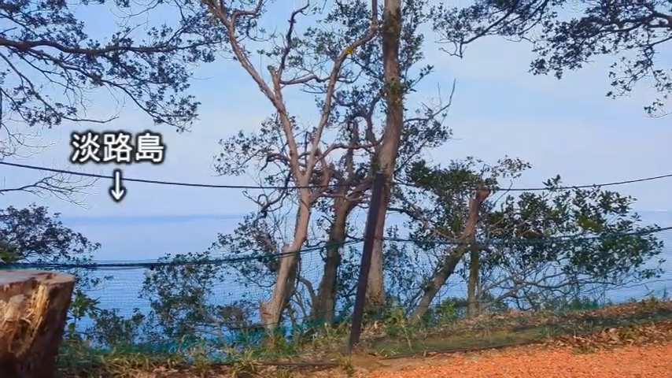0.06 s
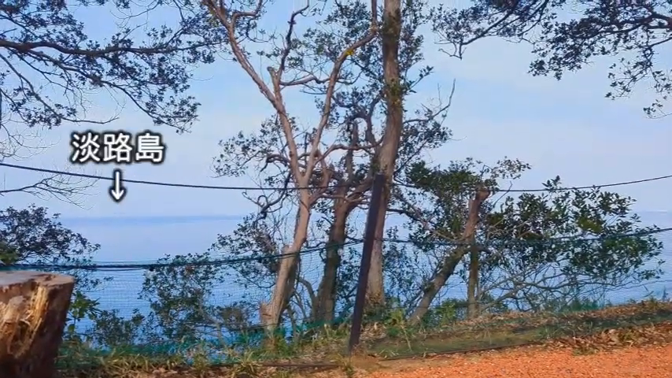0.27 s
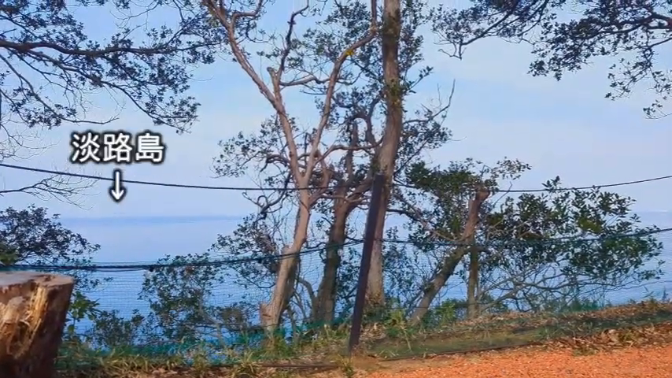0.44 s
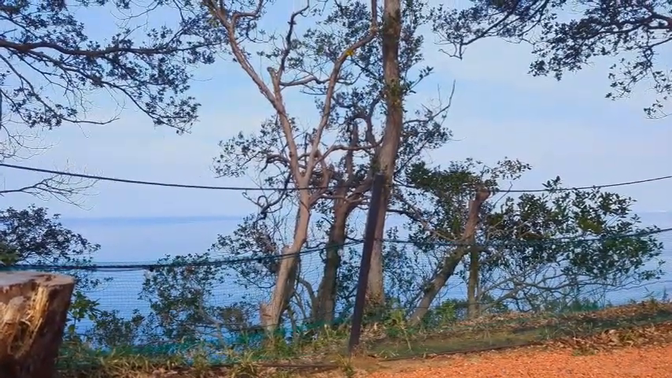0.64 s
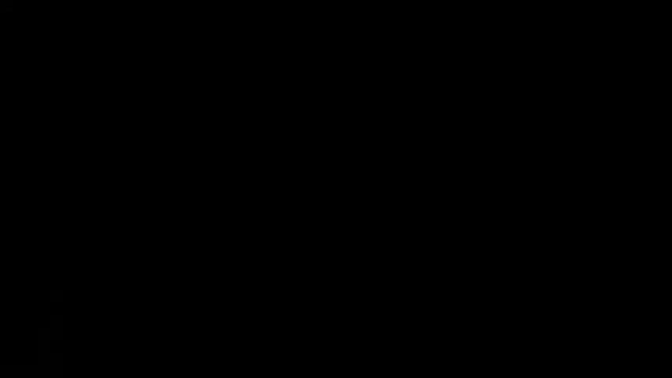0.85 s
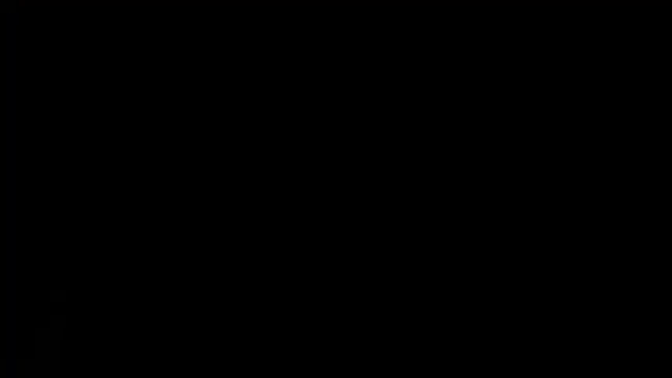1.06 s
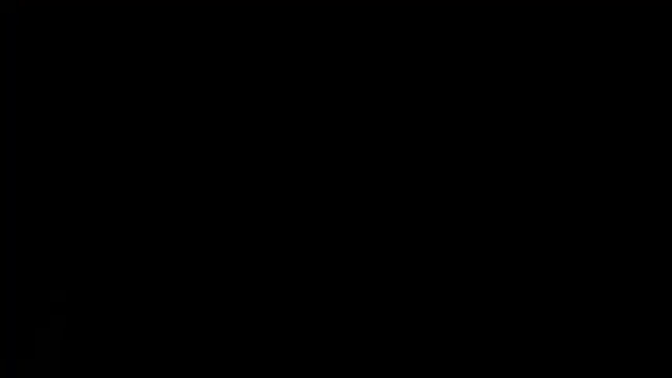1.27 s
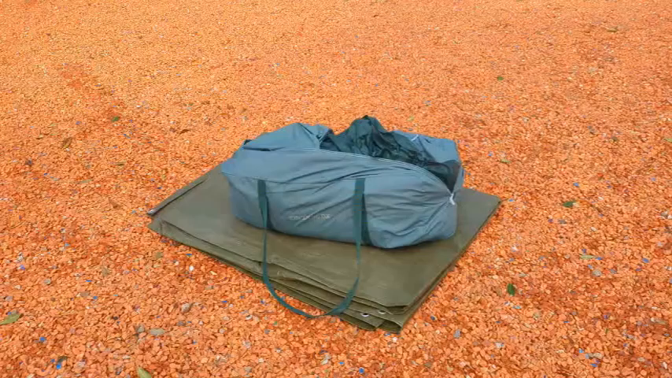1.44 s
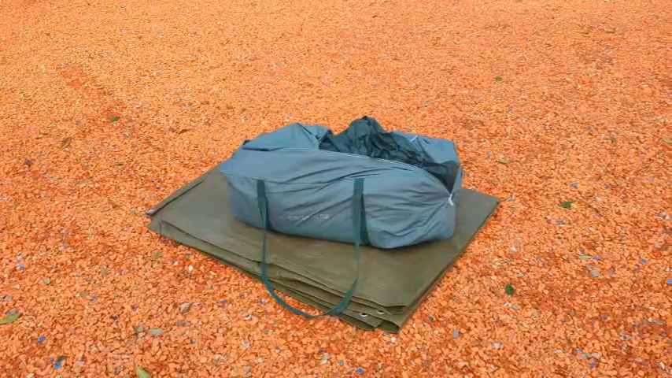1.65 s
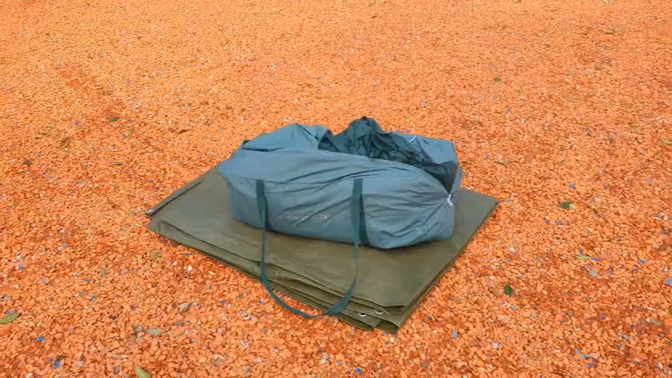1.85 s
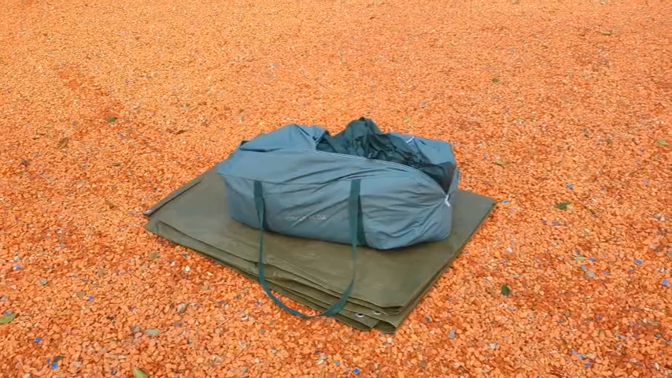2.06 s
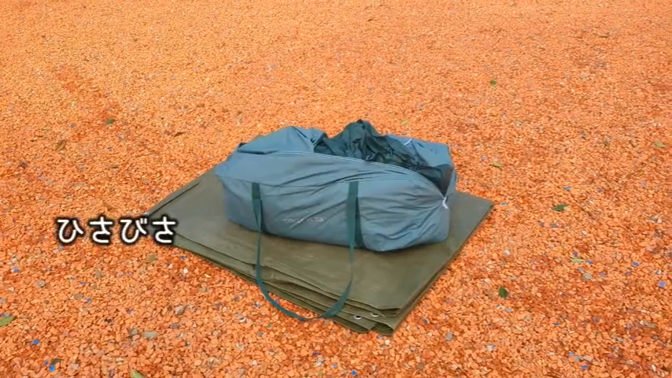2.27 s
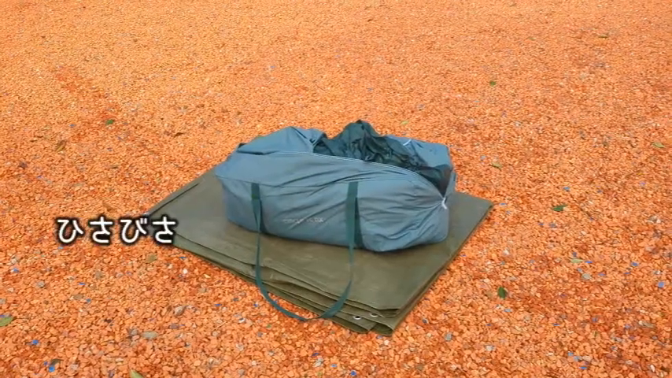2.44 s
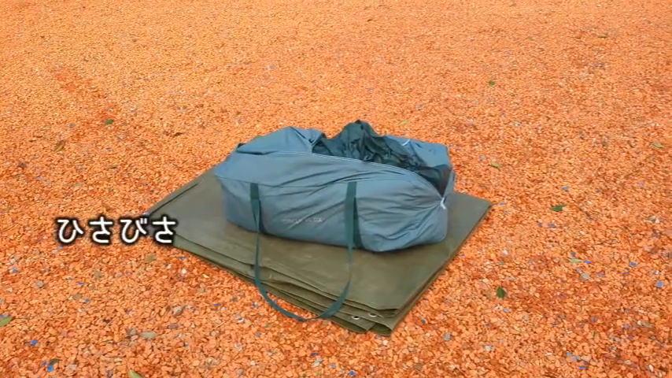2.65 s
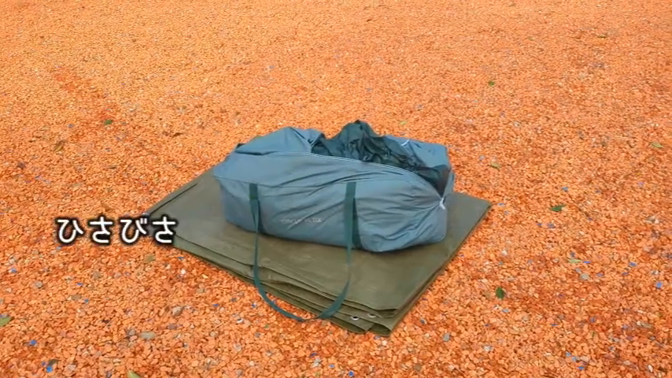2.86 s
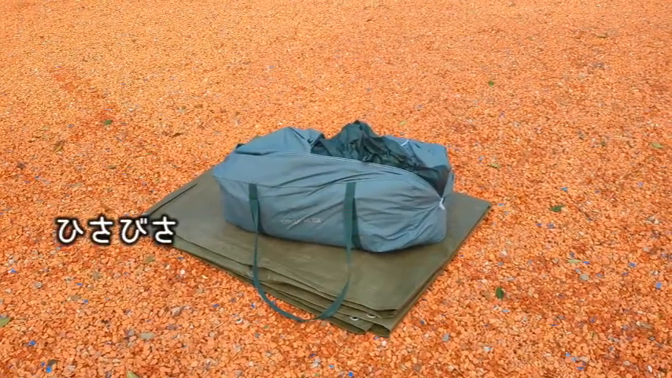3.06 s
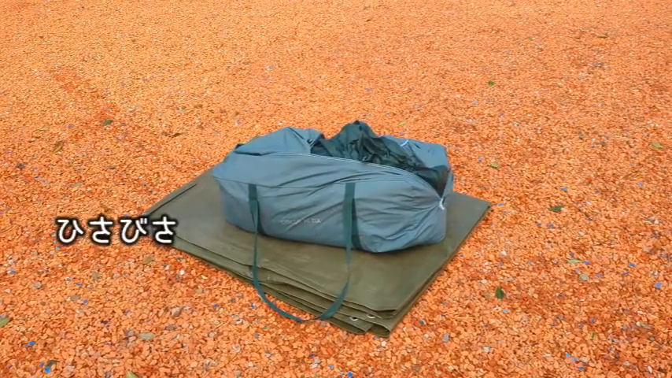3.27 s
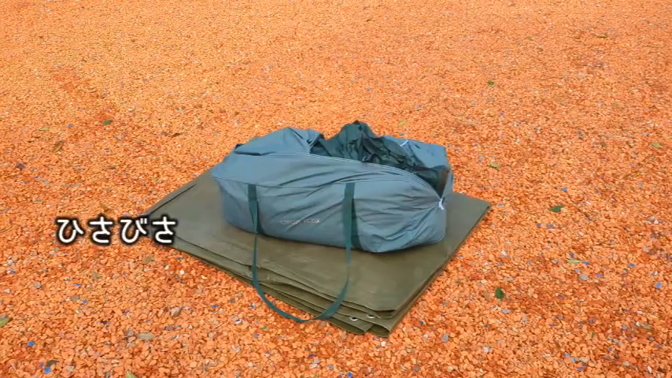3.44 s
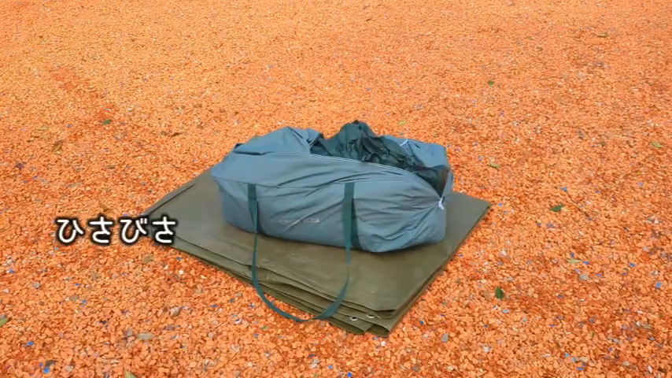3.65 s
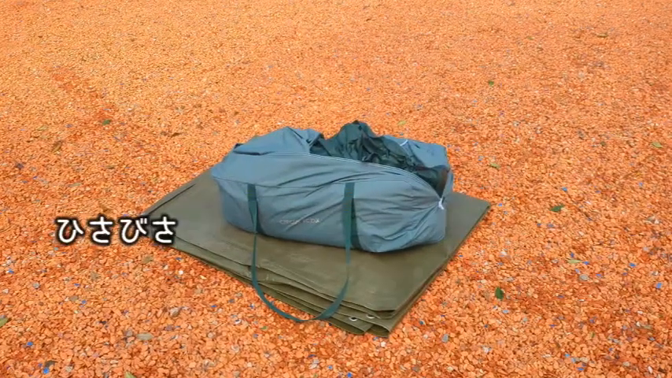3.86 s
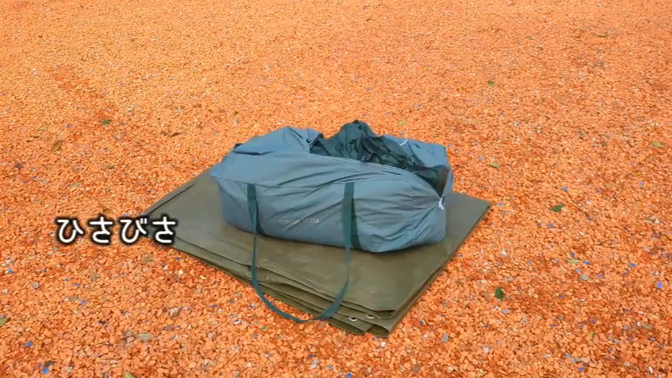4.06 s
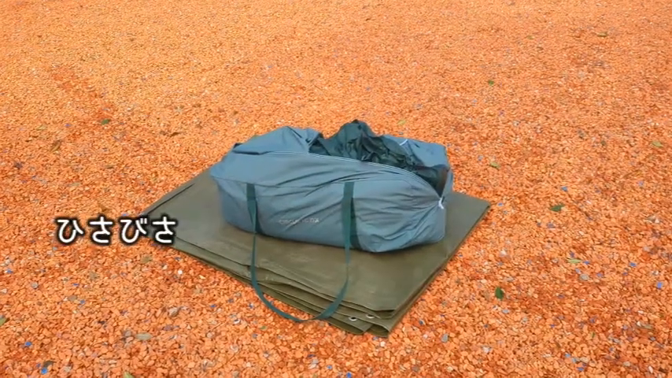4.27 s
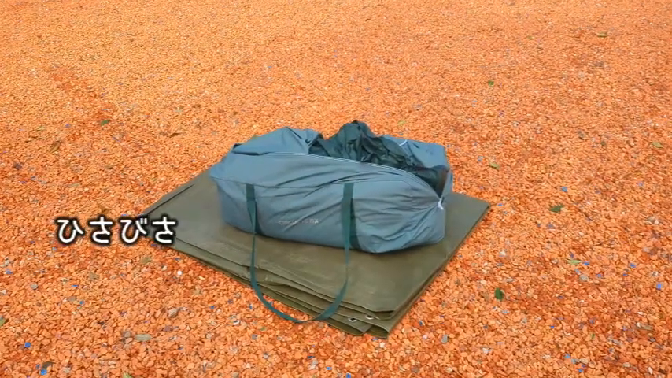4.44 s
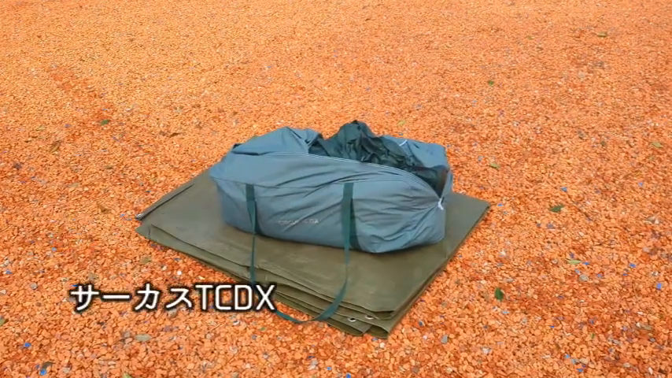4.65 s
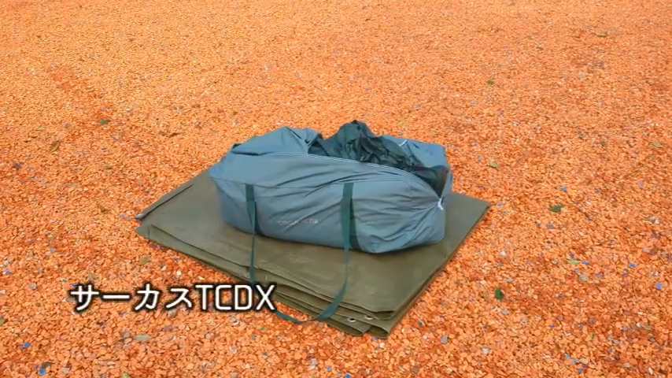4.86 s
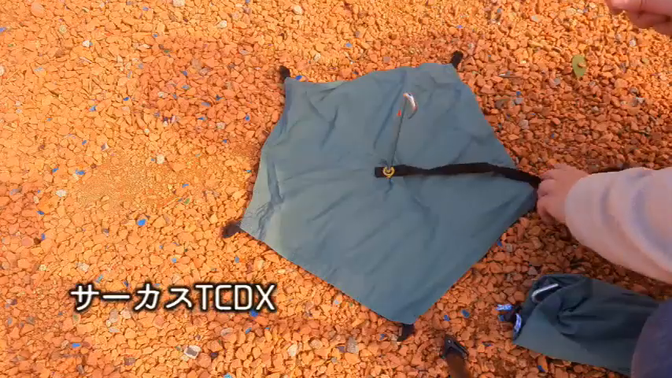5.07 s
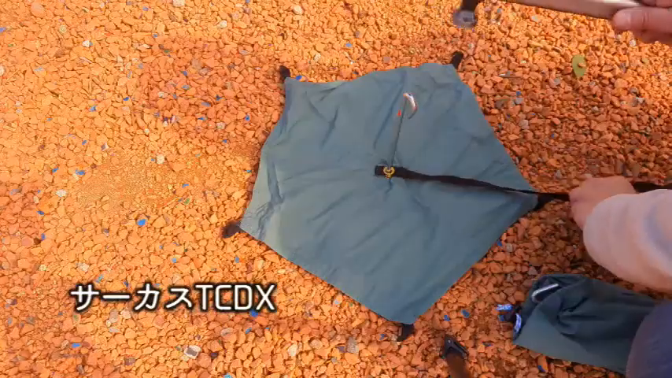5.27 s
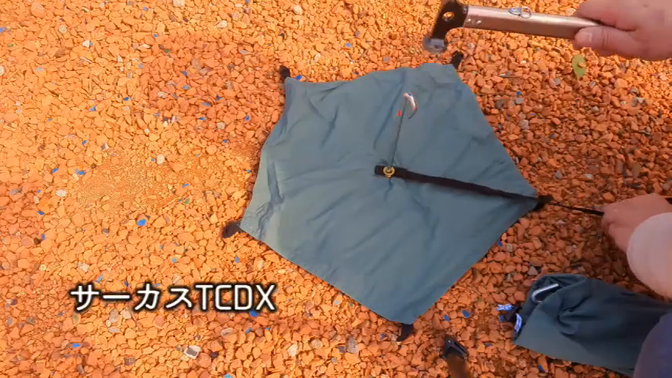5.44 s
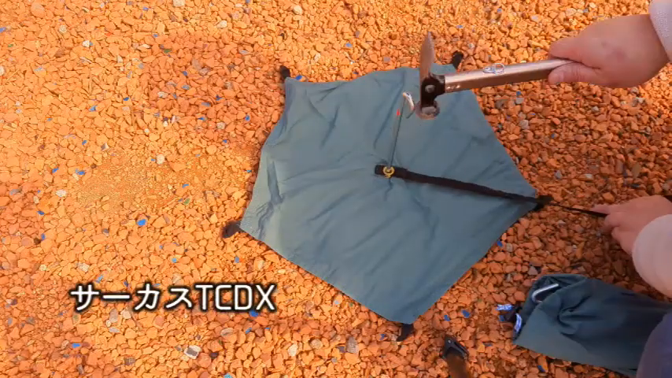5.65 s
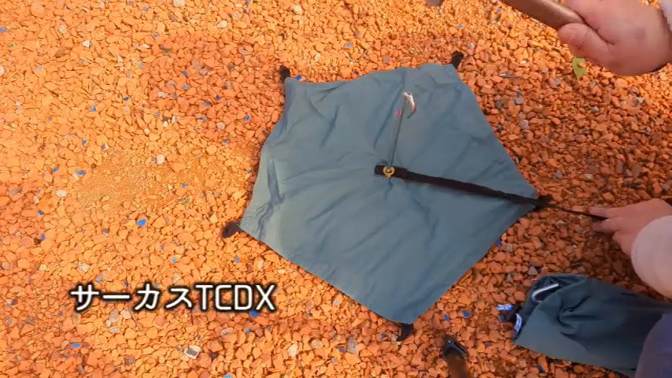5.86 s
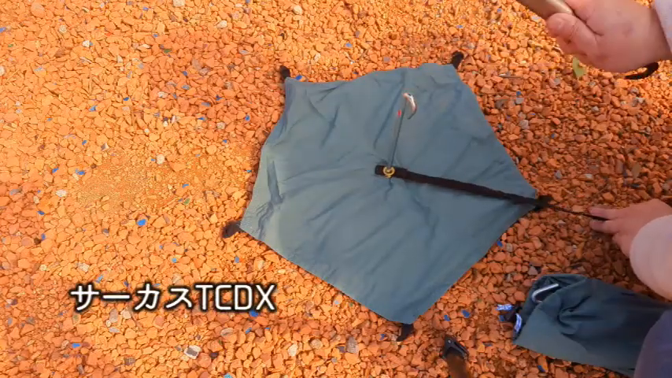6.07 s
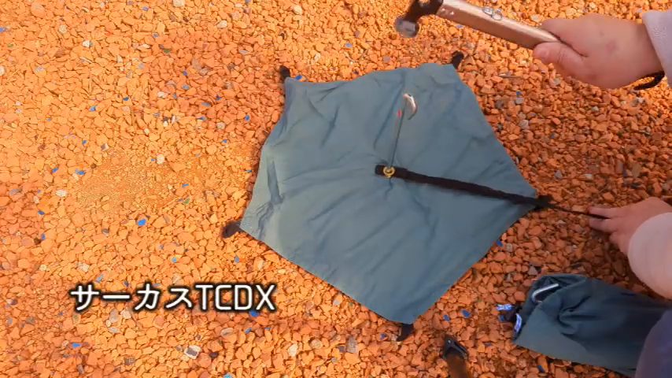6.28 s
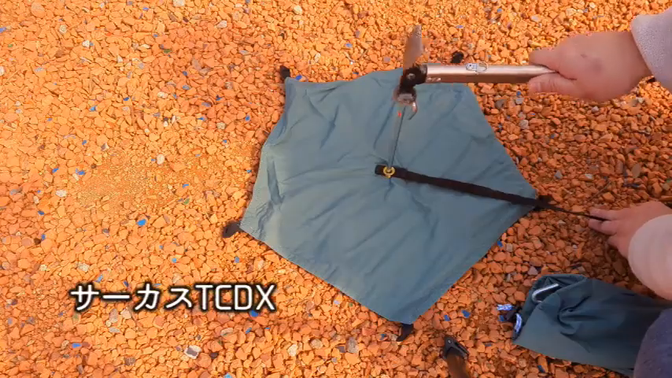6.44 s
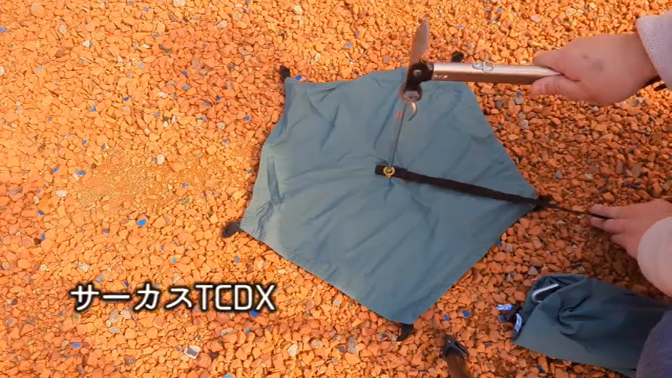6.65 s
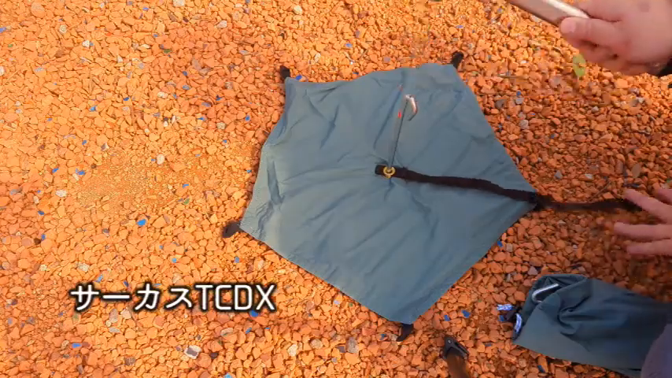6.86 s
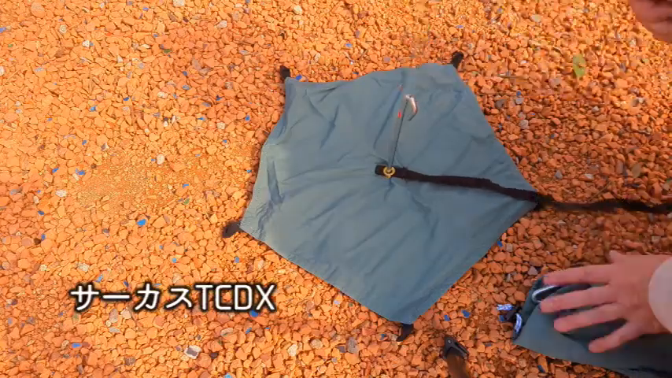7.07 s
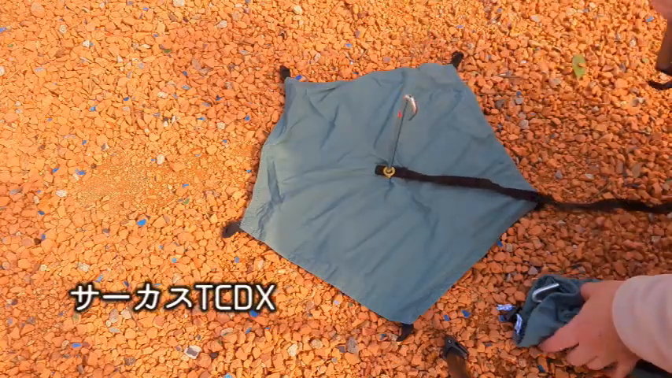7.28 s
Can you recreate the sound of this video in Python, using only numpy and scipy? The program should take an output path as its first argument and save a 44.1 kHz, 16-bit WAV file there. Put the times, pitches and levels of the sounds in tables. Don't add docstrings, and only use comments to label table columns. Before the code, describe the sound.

A quiet outdoor opening of wind rumble and far surf hiss cuts to complete silence. It returns with a steady low motor hum, wind and soft booming bumps of hands on the camera. Another cut brings a close steel hammer: strap rustle and a light touch, then five loud, evenly spaced cracks on a peg in gravel, each ringing briefly and scattering off trees. Small stereo camera microphone; cloth and gravel rustle at the end.

```python
import sys
import numpy as np
from scipy import signal
from scipy.fft import rfft, irfft
from scipy.io import wavfile
from scipy.ndimage import uniform_filter1d

SR = 44100
rng = np.random.default_rng(int(sys.argv[2]) if len(sys.argv) > 2 else 0)


def persist_wave(psi):
    counts = np.round(np.clip(psi, -1, 1) * 32767).astype(np.int16)
    wavfile.write(sys.argv[1], SR, np.atleast_2d(counts).T)


def amplitude_ratio(level_db):
    exponent = np.asarray(level_db, float) / 20
    return 10 ** exponent


N = 322371
T = np.arange(N) / SR

# start in seconds, end in seconds, delay of the left microphone in samples.
SHOTS = [
    (0, .846, -16),
    (1.452, 4.884, -8),
    (4.884, 7.4, 2),
]


def shape(x, points):
    hz, db = np.transpose(points)
    f = np.fft.rfftfreq(x.shape[-1], 1 / SR) + 1
    gain = amplitude_ratio(np.interp(np.log(f), np.log(hz), db))
    return irfft(rfft(x) * gain, x.shape[-1])


def band(x, hz, width_hz):
    centre_hz = min(hz, .42 * SR)
    sharpness = max(hz / min(width_hz, SR / 3), .3)
    return signal.lfilter(*signal.iirpeak(centre_hz, sharpness, SR), x)


def unit(x):
    return x / np.sqrt(np.mean(x ** 2))


def fade(t, t60):
    return (t >= 0) * np.exp(-np.log(1000) * np.abs(t) / t60)


def walk(rate):
    k = int(SR / rate)
    steps = np.repeat(rng.standard_normal(N // k + 1), k)
    return 1.48 * uniform_filter1d(uniform_filter1d(steps, k), k)[:N]


def add(out, s, sound, pan_db=0.):
    i = int(s * SR)
    n = min(sound.shape[-1], N - i)
    out[:, i:i + n] += sound[..., :n] * amplitude_ratio(np.array([[pan_db], [-pan_db]]) / 2)


def late_lows(colour):
    f = np.fft.rfftfreq(SR // 2, 1 / SR) + 1
    delay_s = 0.054 * (55 / np.maximum(f, 30)) ** 1.7
    phase = 2 * np.pi * np.cumsum(delay_s + 0.0024) * 2
    push = shape(irfft(np.exp(-1j * phase)), colour)
    return push[:SR // 4] / np.abs(push).max()


def air():
    # pitch in Hz, level in dB.
    rumble = [
        [(15, -43), (25, -29), (42, -9.5), (65, 3.5), (97, -9.5), (130, -1), (172, -22.5), (195, -19),
         (400, -39), (520, -58), (880, -120)],
        [(15, -43.5), (25, -14), (38, -3.5), (69, 3), (97, -11), (117, -4.5), (156, -13.5), (400, -41),
         (520, -69.5), (880, -120)],
        [(15, -48), (25, -18.5), (43, -4), (65, 2), (81, -9), (113, 0), (156, -14), (178, -24), (400, -37.5),
         (520, -63), (880, -120)],
    ]
    # pitch in Hz, level in dB.
    hiss = [
        [(180, -28), (300, -10.5), (624, -7), (678, -14), (737, -11), (1580, -16), (1930, -10.5), (2880, -17.5),
         (5250, -22.5), (12100, -41), (16000, -58)],
        [(180, -31.5), (300, -4.5), (412, -15), (502, -8.5), (645, -17), (762, -12.5), (856, -17.5),
         (1640, -19.5), (2250, -17.5), (3400, -28.5), (4090, -27), (11900, -43.5), (16000, -54.5)],
        [(180, -29), (300, -10.5), (385, -12.5), (462, -6), (511, -7.5), (885, -14.5), (994, -15.5),
         (1720, -14.5), (4990, -20), (11900, -34), (16000, -43.5)],
    ]
    # time in seconds, wind rumble in dB, far hiss in dB.
    weather = [
        [(0.0, -51, -75.5), (0.13, -48.5, -77.5), (0.31, -51.5, -77.5), (0.58, -50.5, -78.5), (0.678, -50, -78),
         (0.7, -51, -77)],
        [(1.75, -51.5, -78), (2.19, -47.5, -76.5), (2.4, -47, -77), (2.95, -47.5, -79), (3.07, -48.5, -79.5),
         (3.26, -48.5, -78.5), (3.42, -47, -79.5), (3.71, -48.5, -77), (3.86, -54, -77), (4.06, -48, -78),
         (4.2, -47.5, -78.5), (4.48, -47.5, -79), (4.8, -53, -78.5)],
        [(4.95, -51, -78.5), (5.45, -48, -82), (5.61, -50.5, -78), (6.0, -48.5, -77.5), (6.09, -49.5, -75),
         (6.4, -49.5, -75.5), (6.5, -51, -77.5), (6.63, -52.5, -74), (6.84, -48.5, -78), (7.09, -52, -79),
         (7.31, -49, -72.5)],
    ]
    s, wind_db, hiss_db = np.transpose(np.vstack(weather))
    out = np.zeros((2, N))
    for (start, end, lag), low, high in zip(SHOTS, rumble, hiss):
        mid, side = rng.standard_normal((2, N))
        side = shape(side, [(40, -18), (130, -16), (300, -10), (700, -1), (1500, 1.5)])
        pair = np.array([mid + side, mid - side])
        on = (T >= start) & (T < end)
        wind_level = amplitude_ratio(np.interp(T, s, wind_db) + 4 + 1.3 * walk(11))
        hiss_level = amplitude_ratio(np.interp(T, s, hiss_db) + 10.5 + .6 * walk(8))
        out += on * unit(shape(pair, low)) * wind_level
        out += on * unit(shape(pair, high)) * hiss_level
    return out


def bumps(out):
    # time in seconds, peak in dB, boom in dB, edge scratch in dB, left minus right in dB.
    pushes = [(1.515, -45, 4.5, -70.5, -12.5), (1.562, -32.5, 5, -52, -16), (1.596, -45, 8, -53, -4.5),
              (1.619, -47.5, -1, -62, -9.5), (1.665, -54, 14.5, -59.5, -13.5), (1.699, -49, 6.5, -65, -10),
              (1.793, -50, 5, -70, -9.5), (1.943, -48.5, 3, -68, -11), (1.985, -36, 0.5, -72.5, -16.5),
              (2.459, -65, 7, -75, -3), (2.678, -45, 8.5, -69, -13.5), (2.699, -46, 7, -71.5, -11),
              (2.719, -56, 0, -71, -4), (2.855, -60, 3, -76, -1), (3.482, -44.5, 1, -77, -10),
              (3.796, -48, -13, -78, -9.5), (4.149, -51, 0, -70, -13), (4.731, -46, 0, -68, -9.5)]
    t = T[:SR // 10]
    body = late_lows([(130, -32.5), (250, 3.5), (550, -11), (900, -26), (2500, -90.5)])
    boom = late_lows([(35, -24), (55, 5.5), (110, -3), (220, -18), (500, -87)])
    for s, db, boom_db, edge_db, pan_db in pushes:
        scratch = band(band(rng.standard_normal(len(t)), 1500, 2000), 1600, 3500)
        scratch = scratch * fade(t, 0.025) * np.minimum(t / 0.0015, 1)
        add(out, s, amplitude_ratio(db - 1.5) * (body + amplitude_ratio(boom_db) * boom), 1.36 * pan_db)
        add(out, s, amplitude_ratio(edge_db + 10) * scratch, 1.96 * pan_db)


def ticks(out):
    # time in seconds, peak in dB, centre in Hz, width in Hz, 60 dB decay time in seconds.
    grains = [(2.63, -63, 4000, 5000, 0.011), (4.884, -44.5, 1100, 3000, 0.0043),
              (1.565, -46.5, 1290, 1500, 0.018), (3.488, -55.5, 1202, 1200, 0.014),
              (4.732, -52.5, 1100, 1200, 0.018), (7.28, -52, 1500, 1500, .04), (7.298, -55, 890, 900, .03),
              (5.139, -49.5, 1300, 1200, 0.043), (5.152, -60, 2000, 1200, .03),
              (5.162, -56, 1500, 1200, .03), (5.175, -54, 1200, 900, 0.017), (5.195, -62, 1800, 2000, .04),
              (5.646, -20.5, 1500, 900, 0.017), (5.675, -48.5, 400, 150, 0.073),
              (5.96, -46.5, 400, 150, 0.097), (6.205, -49, 400, 150, 0.11), (6.678, -50.5, 400, 150, 0.13),
              (6.91, -64.5, 1200, 800, .02), (6.945, -69.5, 1400, 800, .02), (7.035, -66, 1500, 800, .02),
              (7.26, -52, 1300, 900, 0.025), (4.884, -54, 9220, 11000, .004),
              (4.911, -59, 11000, 3020, 0.011), (4.973, -59, 6550, 3970, 0.011),
              (5.032, -55, 1100, 600, 0.023), (5.76, -58.5, 11200, 7950, 0.022),
              (5.85, -55, 9000, 9000, 0.013), (6.106, -62, 12000, 8070, .02),
              (5.23, -56, 8960, 9000, 0.012), (5.242, -60, 7960, 8980, .02),
              (5.264, -70, 5000, 6030, 0.013), (5.303, -54, 7000, 6000, 0.009),
              (5.343, -60.5, 7950, 8930, .01), (5.607, -55.5, 8000, 9000, 0.025),
              (5.619, -50, 12030, 5930, .02), (5.653, -12.5, 4870, 7180, 0.034),
              (5.664, -28, 6940, 5220, 0.016), (5.699, -43, 7880, 9130, 0.039),
              (5.883, -56.5, 12950, 6180, 0.033), (6.128, -45.5, 11140, 7880, 0.073),
              (6.236, -33, 8270, 1960, 0.02), (6.245, -36, 10920, 8940, 0.018),
              (6.371, -42.5, 10150, 8900, 0.034), (6.433, -21, 900, 1993, 0.013),
              (6.451, -27.5, 900, 1994, 0.021), (6.606, -42.5, 10030, 8900, .04),
              (6.978, -51, 998, 600, .02), (7.01, -59, 1300, 600, 0.014), (7.084, -57.5, 1180, 700, 0.029),
              (7.13, -44.5, 1080, 590, 0.013), (7.13, -50, 3500, 3000, 0.016),
              (7.145, -66, 2700, 400, .015)]
    t = T[:SR // 10]
    for s, db, hz, width_hz, t60 in grains:
        mid, side = rng.standard_normal((2, len(t)))
        pair = np.array([mid + 0.26 * side, mid - .4 * side])
        grain = band(band(pair, hz, width_hz), hz, 1.8 * width_hz)
        swell = np.minimum(t / (0.057 * t60), 1)
        add(out, s, amplitude_ratio(db) * unit(grain) * fade(t, t60) * swell)


def motor():
    # time in seconds, base note in Hz, then levels in dB of the base, its double and 8th multiple.
    hum = [(1.72, 93.7, -37.5, -53.5, -76.5), (1.89, 93.13, -36.5, -59, -78), (2.33, 93.8, -40, -52, -91),
           (2.43, 92.76, -40, -61.5, -81.5), (2.8, 92.8, -40.5, -56.5, -83.5),
           (3.02, 92.9, -41.5, -72, -83), (3.06, 92.7, -43, -64, -79), (3.26, 92.36, -46, -81, -81),
           (3.51, 90.9, -41.5, -62.5, -86), (3.73, 90.76, -42.5, -66.5, -91), (3.79, 90.3, -39.5, -61, -98),
           (3.99, 91.2, -37, -70, -80), (4.22, 90.9, -37.5, -66, -78.5), (4.72, 90.8, -38.5, -60.5, -78.5),
           (4.75, 90.8, -40, -87, -101), (4.86, 90.3, -42.5, -60, -83)]
    s, hz, *levels = np.transpose(hum)
    phase = 2 * np.pi * np.cumsum(np.interp(T, s, hz) * (1 + .006 * walk(15))) / SR
    tones = np.zeros(N)
    for k, db in zip((1, 2, 8), levels):
        tones += amplitude_ratio(np.interp(T, s, db) + 1.5 * walk(20)) * np.sin(k * phase)
    return np.sqrt(2) * tones * (T > SHOTS[1][0]) * (T < SHOTS[1][1])


def birds(out):
    # time in seconds, length in seconds, start pitch in Hz, end pitch in Hz, level in dB.
    calls = [(2.24, .14, 790, 785, -70.5), (3.03, 0.11, 440, 445, -62.5), (3.15, 0.066, 445, 440, -62),
             (6.03, 0.075, 570, 500, -63), (6.84, 0.11, 400, 410, -63), (6.97, 0.076, 2900, 2800, -70),
             (7.05, 0.063, 4900, 4900, -74), (7.15, 0.067, 2750, 2640, -66), (7.166, .08, 2916, 2900, -69)]
    for s, length, start_hz, end_hz, db in calls:
        n = int(length * SR)
        phase = 2 * np.pi * np.cumsum(np.linspace(start_hz, end_hz, n)) / SR
        add(out, s, amplitude_ratio(db) * np.hanning(n) * np.sin(phase))


def rings(out):
    # time in seconds, long note in dB, short note in dB, left minus right of the short one in dB,
    # seconds until the rising hammer turns the ring away, drop in dB.
    peg = [
        (4.884, -57, -38, -11.5, 0.053, -8),
        (5.643, -42, -18.5, 8, 0.062, -7.5),
        (5.936, -46.5, -21, -7, 0.098, -10.5),
        (6.181, -46.5, -37.5, -17, .11, -4.5),
        (6.418, -39, -30.5, -9, .12, -10.5),
        (6.657, -43.5, -40.5, -22, 0.16, -9.5),
    ]
    peg_hz = (2635, 2645)
    peg_t60_s = (0.62, 0.35)
    # time in seconds, then five group levels in dB.
    drives = [
        (4.884, -52, -75, -76, -59, -80),
        (5.644, -14.5, -25.5, -32.5, -32, -40),
        (5.935, -28.5, -27, -20.5, -25.5, -25.5),
        (6.182, -30.5, -33.5, -41.5, -25, -12),
        (6.42, -25, -28.5, -19, -30.5, -10),
        (6.658, -32, -39.5, -37.5, -31, -16.5),
    ]
    steel_hz = [(3140, 3030, 3188), (3680, 4240, 4860), (5286, 5190, 5925),
                (8556, 8305, 7430, 7910, 6860, 10500), (14663, 14850, 15336, 13324, 11560)]
    # level in dB, 60 dB decay time in seconds, left minus right in dB.
    steel_notes = [
        [(2.5, 0.074, -2.5), (2.5, 0.043, -0.5), (-6.5, 0.14, 3)],
        [(3.5, 0.044, -9), (-2, 0.027, 1.5), (-2, 0.018, -0.5)],
        [(-1.5, 0.13, -0.5), (2, 0.03, 8), (-13.5, 0.073, -6)],
        [(-0.5, 0.068, 4.5), (-10.5, 0.033, 2), (-4, .04, -11), (-7, .05, -2), (-5.5, .03, -0.5),
         (-10.5, .05, 5.5)],
        [(2.5, 0.047, 1.5), (-7, .04, -4.5), (-17, .04, -1), (-20.5, .03, 4.5), (-11, 0.035, -7)],
    ]
    t = T[:SR // 2]
    rise = np.minimum(t / .0006, 1)
    for s, long_db, short_db, pan_db, hold, drop_db in peg:
        turned = rise * amplitude_ratio(drop_db * np.clip((t - hold) / .016 + 1, 0, 1))
        for hz, t60, db, side_db in zip(peg_hz, peg_t60_s, (long_db, short_db), (0, pan_db)):
            tone = np.sin(2 * np.pi * hz * t) * fade(t, t60)
            add(out, s, amplitude_ratio(db) * tone * turned, side_db)
    for s, *drive in drives:
        for pitches, family, drive_db in zip(steel_hz, steel_notes, drive):
            for hz, (db, t60, pan_db) in zip(pitches, family):
                jitter, turn = rng.standard_normal(2)
                phase = 0.52 * turn * np.array([[1], [-1]])
                tone = np.sin(2 * np.pi * hz * (1 + 0.002 * jitter) * t + phase)
                add(out, s, amplitude_ratio(drive_db + db) * tone * fade(t, t60) * rise, pan_db)


def scatter(steel):
    # pitch in Hz, level in dB.
    tree_colour = [(250, -12), (420, -1), (900, -12.5), (2000, 4.5), (3100, -4.5), (4200, -0.5),
                   (5300, -2.5), (8000, -3), (12000, -2), (15500, -0.5)]
    level_db, t60_s = -19.5, .36
    t = T[:SR // 2]
    echo = shape(rng.standard_normal((2, len(t))), tree_colour)
    echo = echo * fade(t, t60_s) * np.minimum(t / 0.025, 1)
    echo = echo * amplitude_ratio(3.0 * walk(55)[:len(t)])
    echo = echo / np.linalg.norm(echo[0])
    return amplitude_ratio(level_db) * signal.fftconvolve(steel, echo, axes=1)[:, :N]


def rustle():
    # time in seconds, fine cloth in dB, coarse strap in dB.
    rubs = [
        [(4.92, -75, -72), (5.096, -87, -72.5), (5.15, -66.5, -62), (5.224, -74, -73), (5.228, -65, -67.5),
         (5.29, -85, -81), (5.3, -78, -76), (5.33, -90.5, -75), (5.344, -65.5, -75), (5.352, -82.5, -70.5),
         (5.598, -91, -82.5), (5.6, -81, -73)],
        [(6.85, -71.5, -72), (6.956, -84, -72.5), (6.974, -73, -74), (6.996, -92, -67.5), (7.204, -81, -67),
         (7.286, -56.5, -58), (7.31, -59.5, -64)],
    ]
    s, fine_db, coarse_db = np.transpose(np.vstack(rubs))
    fine, coarse = (rng.standard_normal((2, N)) * amplitude_ratio(3.2 * walk(rate)) for rate in (300, 150))
    fine = unit(shape(fine, [(2500, -18), (4500, -5.5), (8500, 6), (15000, -7)]))
    coarse = unit(shape(coarse, [(500, -4), (1200, 1.5), (2500, -7), (5000, -24.5)]))
    both = fine * amplitude_ratio(np.interp(T, s, fine_db)) + coarse * amplitude_ratio(np.interp(T, s, coarse_db))
    rubbing = (T < rubs[0][-1][0]) | (T > rubs[1][0][0])
    return both * ((T > s[0]) & rubbing)


def blows(out):
    # time in seconds, crack peak in dB, knock in dB, ground thud in dB, knock pitch in Hz,
    # left minus right in dB.
    hits = [
        (5.642, -3.5, -25.5, -39.5, 589.7, 2),
        (5.934, 0.5, -33.5, -35, 308.8, 2.5),
        (6.181, -0.5, -39.5, -35.5, 301, -0.5),
        (6.418, 1.5, -37, -35, 286, 0.5),
        (6.657, 0.5, -38.5, -38, 307, -1.5),
    ]
    # pitch in Hz, level in dB.
    crack_colour = [(530, -58.5), (900, -7), (1990, -13.5), (2790, -7.5), (4540, -15.5), (5130, 1.5),
                    (5790, -16), (6790, -1.5), (7300, -11), (8350, 4.5), (9660, -11.5), (13400, -11),
                    (14800, -8), (15700, -15), (16500, -38.5)]
    t = T[:SR // 4] - .006
    before = np.minimum(t, 0)
    build_up = amplitude_ratio(-9.5) * np.exp(before / 0.001) + amplitude_ratio(-18.5) * np.exp(before / 0.0033)
    bounce = amplitude_ratio(-21.5) * fade(t - .0045, 0.065)
    burst = fade(t, 0.011) + bounce + (t < 0) * build_up
    thud = late_lows([(35, -31.5), (55, 2.5), (120, 5), (200, -10.5), (400, -29), (900, -63)])
    for s, crack_db, knock_db, thud_db, knock_hz, pan_db in hits:
        mid, side = rng.standard_normal((2, len(t)))
        side = shape(side, [(900, -16), (2500, -1.5), (12000, 2.5)])
        crack = unit(shape(np.array([mid + side, mid - side]), crack_colour)) * burst
        knock = np.sin(2 * np.pi * knock_hz * t) + .5 * np.sin(2 * np.pi * 1.4 * knock_hz * t)
        add(out, s - .0042, amplitude_ratio(crack_db - 5.5) * crack, pan_db)
        add(out, s - .0042, amplitude_ratio(knock_db + 14) * knock * fade(t, 0.013))
        add(out, s, amplitude_ratio(thud_db + 6.5) * thud)


def scene():
    steel = np.zeros((2, N))
    rings(steel)
    blows(steel)
    out = air() + motor() + rustle() + steel + scatter(steel)
    for source in (bumps, ticks, birds):
        source(out)
    lag = sum(((T >= start) & (T < end)) * samples for start, end, samples in SHOTS)
    out[0] = out[0, np.clip(np.arange(N) - lag, 0, N - 1)]
    return out


def band_limit(x):
    return signal.sosfilt(signal.butter(12, 16820, fs=SR, output="sos"), x)


def record(dry):
    fade_out_s, fade_in_s = 0.0011, 0.065
    low_cut = signal.butter(4, 38, "high", fs=SR, output="sos")
    top_cut = signal.ellip(8, .3, 40, 15800, fs=SR, output="sos")
    filtered = signal.sosfilt(top_cut, signal.sosfilt(low_cut, dry))
    heard = .96 * np.tanh(filtered / .96)
    first_shot = np.clip((SHOTS[0][1] - T) / fade_out_s, 0, 1)
    later_shots = np.clip((T - SHOTS[1][0]) / fade_in_s, 0, 1)
    return band_limit(heard * (first_shot + later_shots))


dry = scene()
out = record(dry)
persist_wave(out)
```